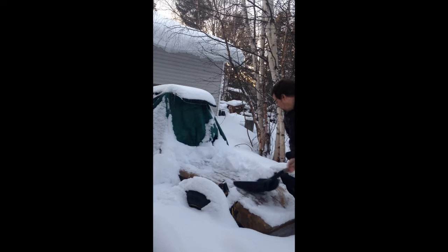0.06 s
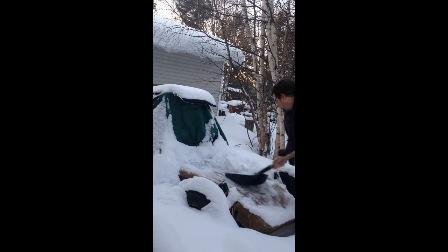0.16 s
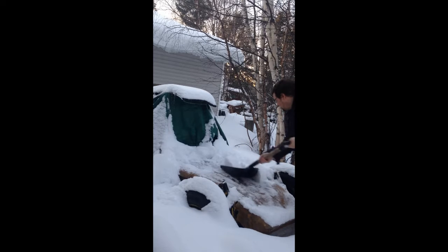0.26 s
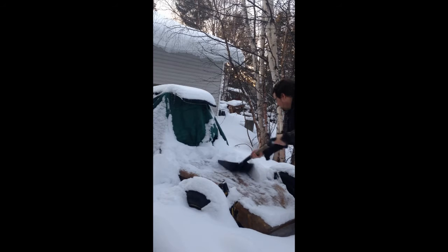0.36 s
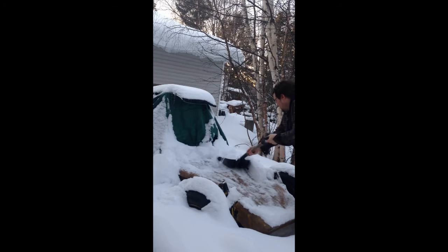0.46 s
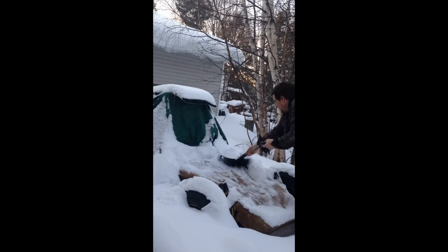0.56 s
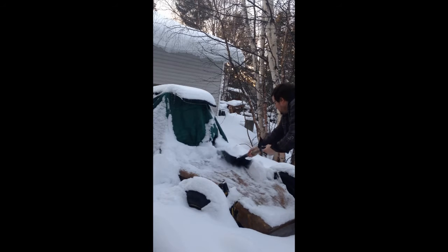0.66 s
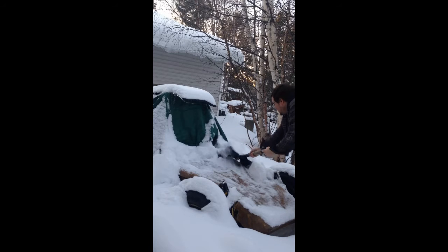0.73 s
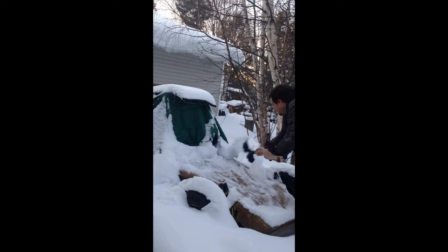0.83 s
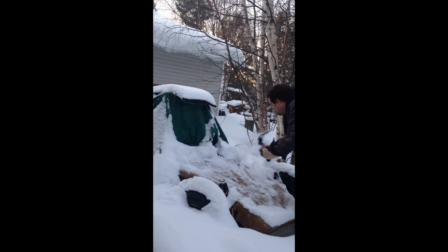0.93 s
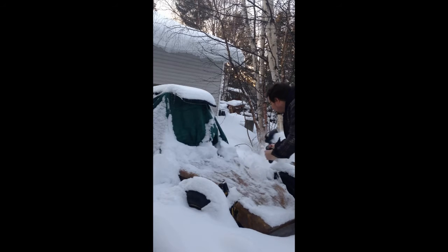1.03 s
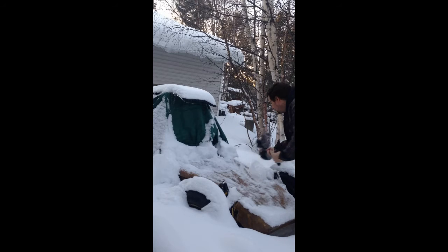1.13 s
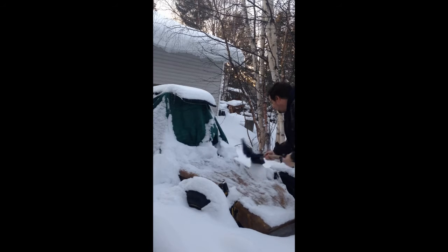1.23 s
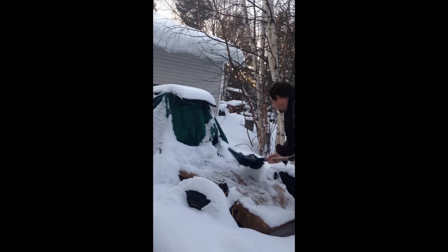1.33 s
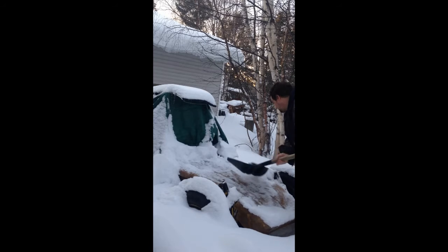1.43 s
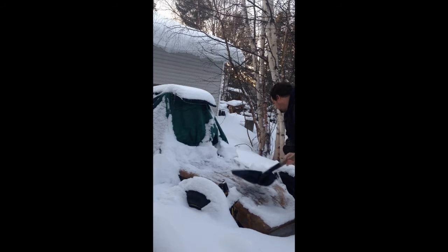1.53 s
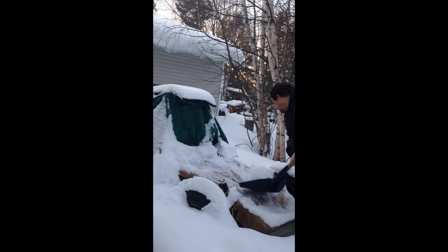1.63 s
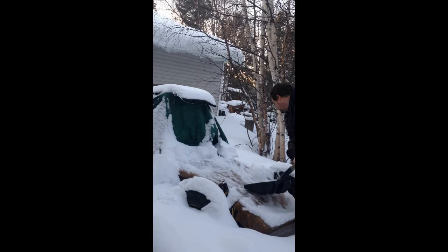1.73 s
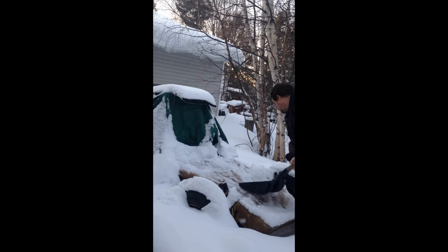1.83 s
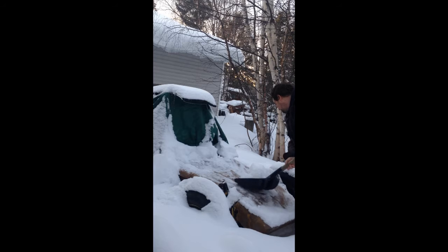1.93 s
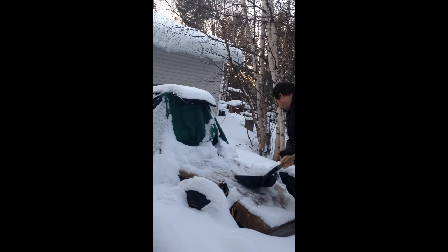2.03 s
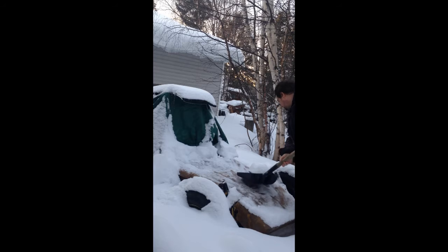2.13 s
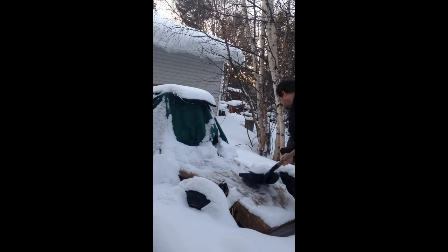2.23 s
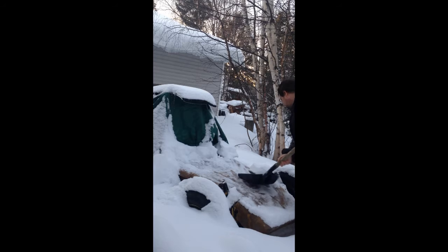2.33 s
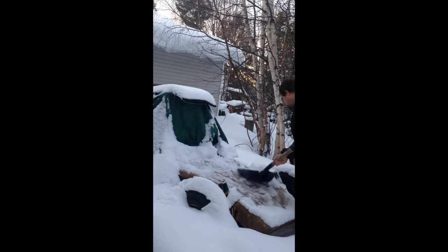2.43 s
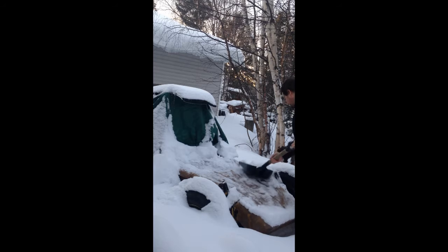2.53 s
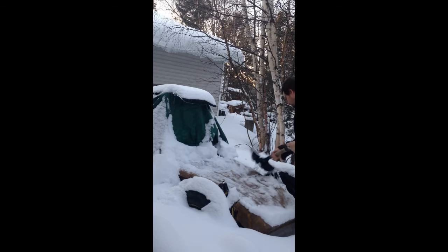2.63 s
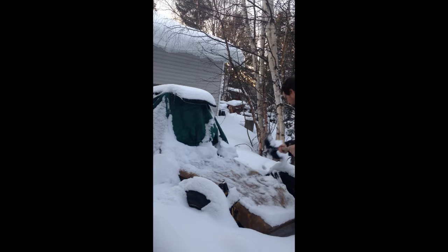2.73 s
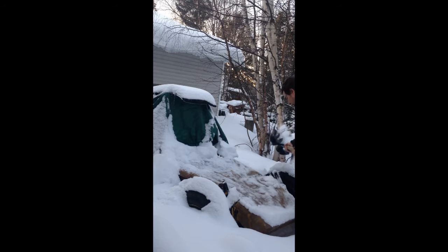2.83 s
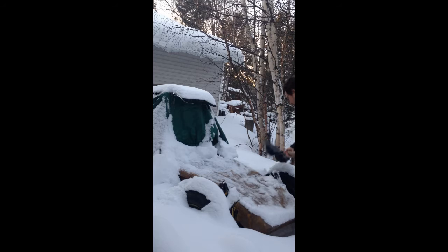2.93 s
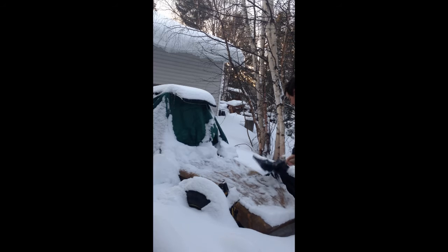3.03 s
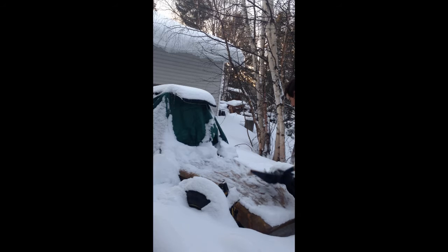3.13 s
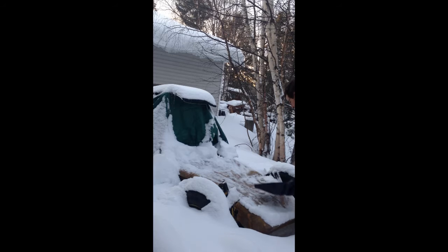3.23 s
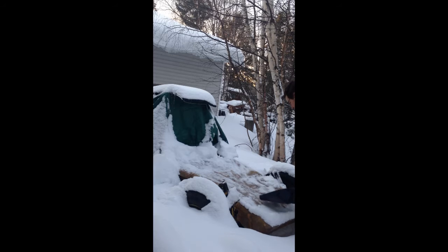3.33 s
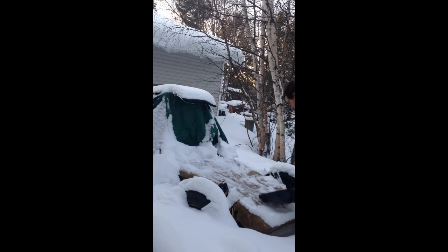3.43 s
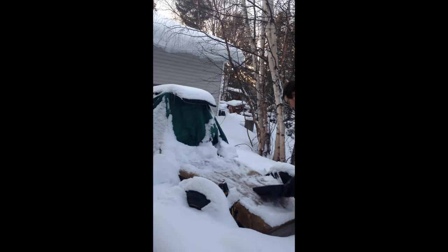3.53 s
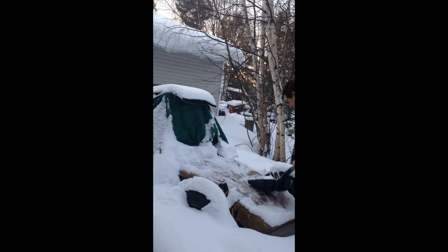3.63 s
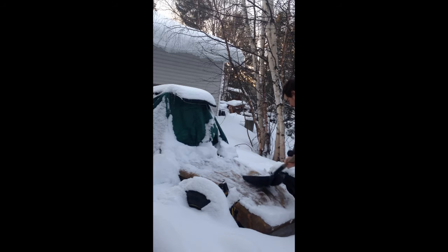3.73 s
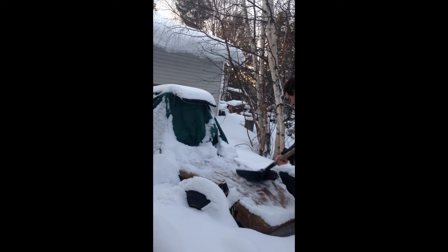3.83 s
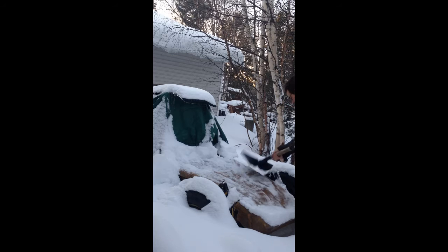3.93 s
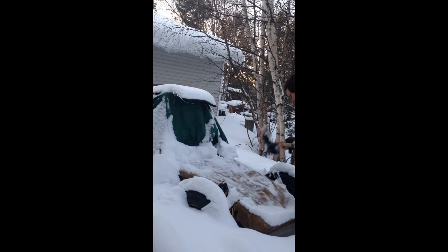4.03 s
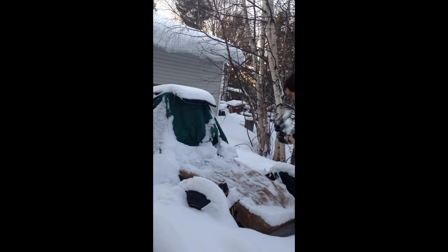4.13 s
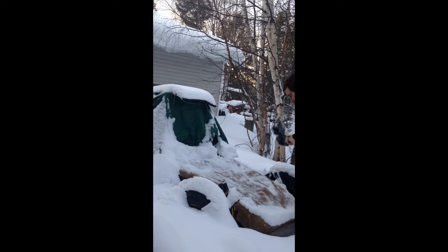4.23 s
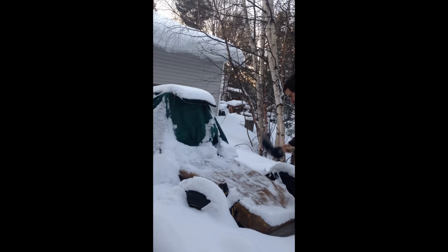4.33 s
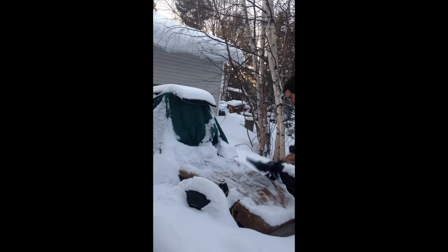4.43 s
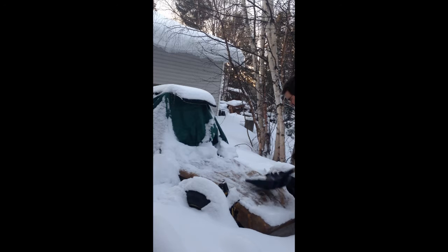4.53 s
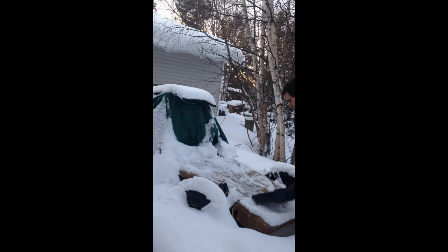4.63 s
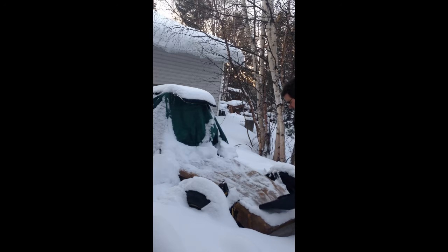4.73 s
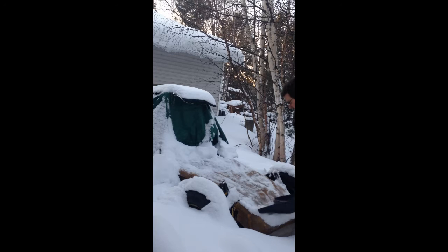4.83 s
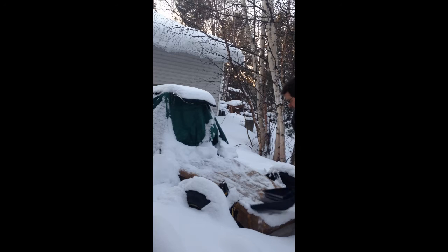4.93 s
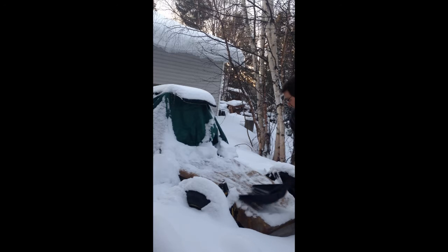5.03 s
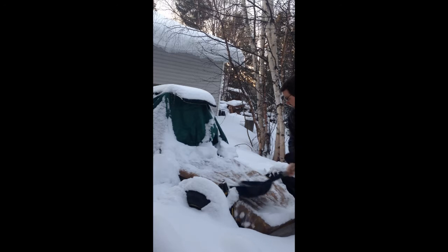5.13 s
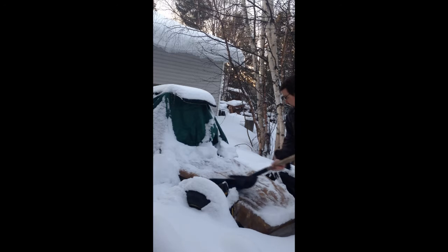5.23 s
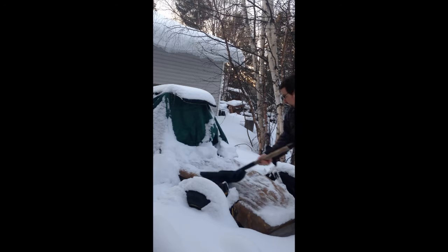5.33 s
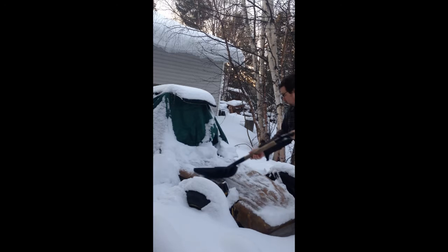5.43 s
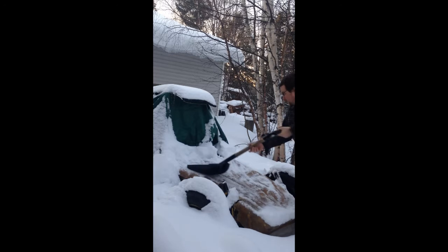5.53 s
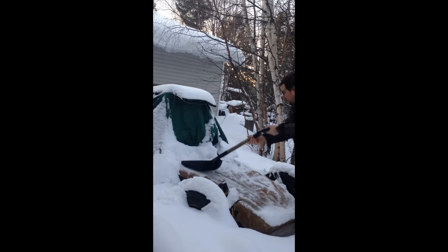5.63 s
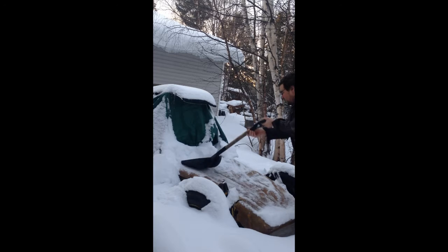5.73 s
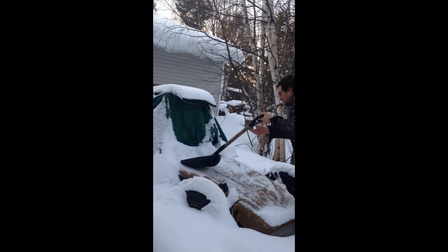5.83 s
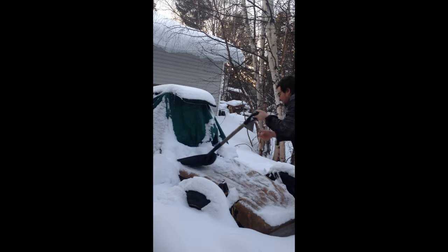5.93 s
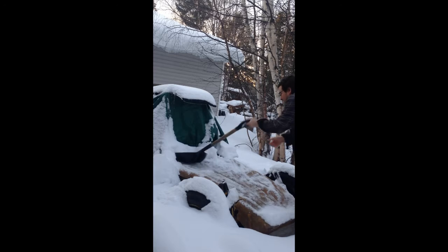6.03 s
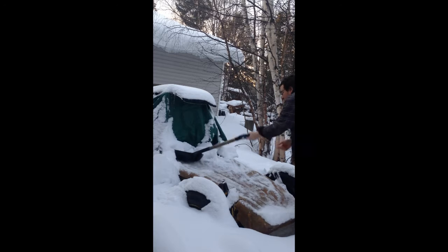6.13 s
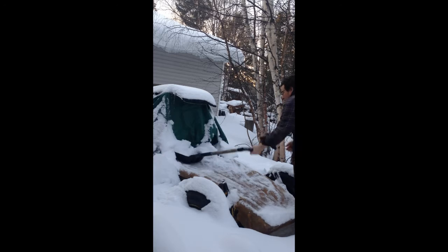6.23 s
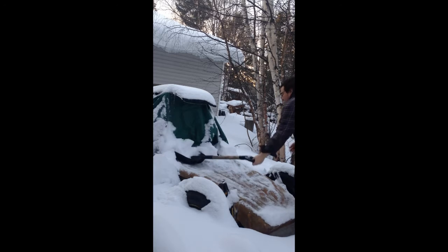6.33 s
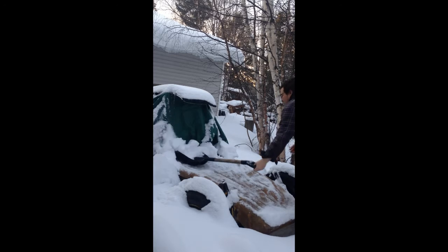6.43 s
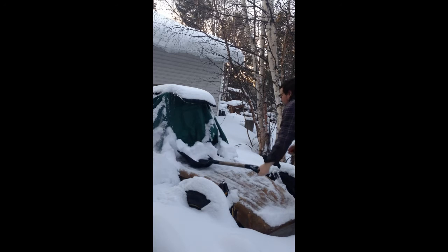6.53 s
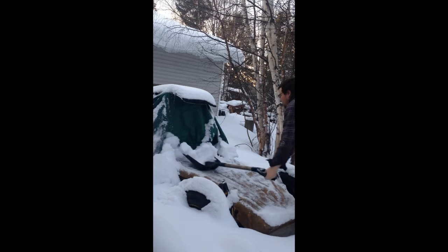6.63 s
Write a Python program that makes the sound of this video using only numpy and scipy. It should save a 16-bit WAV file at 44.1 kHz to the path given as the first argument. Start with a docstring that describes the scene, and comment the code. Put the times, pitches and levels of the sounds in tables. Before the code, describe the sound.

A plastic shovel scrapes and crunches through packed snow on a woodpile, in several strokes with short pauses, outdoors.

```python
"""A plastic snow shovel bites into packed snow on a woodpile, scrapes along and tips its load.
Snow crystals break against the blade in a dense crunch while lumps crack off and crumbs drop.
The blade, its hollow belly and the pile ring dully; the edge adds a crisp hiss.
Distant rumble and faint air lie underneath, with a few dull echoes; one microphone, outdoors."""
import sys
import numpy as np
from scipy import signal
from scipy.fft import rfft, irfft
from scipy.io import wavfile

SR = 44100
rng = np.random.default_rng(int(sys.argv[2]) if len(sys.argv) > 2 else 0)


def bounce(signal):
    """Save signal as a 16-bit WAV file at the path given by the first command-line argument."""
    frames = np.transpose(np.atleast_2d(signal))
    limited = np.clip(frames, -1, 1)
    pcm = np.round(limited * 32767).astype(np.int16)
    wavfile.write(sys.argv[1], SR, pcm)


N = 294147

# pressure on the snow, one list a stroke:
# (time [s], crunch level [dB], treble over crunch [dB], bass over crunch [dB])
STROKE_CURVES = [
    [(0.0, -25.5, -7, -2), (0.062, -30.5, 2.5, -14), (0.078, -33, 3.5, -7), (0.124, -34.5, -4, -6),
     (0.14, -47.5, -3, -4), (0.232, -22.5, 2.5, -8), (0.278, -25, -7, -15), (0.292, -32.5, 4, -3),
     (0.32, -17.5, -5.5, -14), (0.462, -33.5, 1.5, -9), (0.586, -29, -12, -9), (0.608, -39, -4, -13)],
    [(1.756, -22.5, -19.5, 1), (1.778, -21.5, -5, -5), (1.82, -43.5, -10, -1), (1.84, -45, 6, 7),
     (1.908, -25, -3.5, -9), (1.914, -23.5, -0.5, -14), (1.976, -27, 7, -8.5), (2.144, -43, 4, 1),
     (2.176, -37.5, -1, -13), (2.222, -55.5, 8, -8), (2.416, -61.5, -2, -9), (2.425, -54, 7, -11)],
    [(2.43, -69, 21, -3), (2.446, -29.5, 2, -6), (2.48, -32.5, 3, -22), (2.504, -25, 3.5, 0.5),
     (2.514, -19, -8, -6.5), (2.534, -28.5, 4.5, -2), (2.622, -21.5, -10, -9), (2.648, -26, -5, -9),
     (2.664, -34.5, -7, -6), (2.722, -50.5, 4, -6), (2.726, -55, 14, -6), (2.86, -72.5, 7, -9)],
    [(3.492, -33, -25, -6), (3.53, -49, -8, 10), (3.61, -20, -2, -18), (3.66, -21, -10, -5),
     (3.728, -24.5, -6, -7), (3.758, -15, -5.5, -2.5), (3.806, -32.5, 3, -3), (3.828, -31.5, -2, 1),
     (3.894, -26, 4, -11), (4.004, -17, -11, -16.5), (4.052, -38, -7.5, -14.5), (4.2, -69.5, 1, -4)],
    [(4.792, -35, 0, -6), (4.798, -22, -8.5, -16.5), (4.808, -19, -3, -2), (4.832, -23.5, -12, -9),
     (4.888, -45, -12, -7), (4.934, -54.5, -10, 18), (4.99, -37, -26, 4)],
    [(5.0, -35, -22, -10), (5.06, -27, -10.5, -10), (5.094, -32, -3, 4), (5.124, -23.5, -7, -5),
     (5.172, -18, -4.5, 2), (5.228, -30, -10.5, 3), (5.26, -22.5, -3, -15), (5.416, -22.5, 0, -1.5),
     (5.522, -25.5, -3.5, -25), (5.534, -29, -3, -11), (5.568, -24, -0.5, -39), (5.6, -34, -2, -24)],
    [(5.61, -35.5, 0, -17), (5.634, -34.5, -6, -10), (5.646, -31.5, -5.5, -15), (5.676, -28, -9.5, -9),
     (5.696, -40, 6.5, 4), (5.728, -32, -2.5, -3), (5.758, -32.5, -2.5, -14), (5.768, -24.5, -1.5, -10),
     (5.814, -24, -2, 1), (5.886, -37, -3.5, -7), (5.936, -31.5, -7.5, -13), (5.98, -42.5, 0, 1)],
    [(5.99, -39, 3.5, -8), (6.024, -29, 1.5, -8), (6.136, -21.5, -3, -2.5), (6.214, -22, -4, -2),
     (6.294, -44.5, -4, 0), (6.324, -32.5, -4.5, -6), (6.384, -35.5, -3, -4), (6.41, -37, 0, -16),
     (6.434, -44, 0, 1), (6.556, -28, -2.5, -4), (6.562, -36.5, 2, 2), (6.67, -38, 4, 0)],
]
# how load and angle colour each stroke: (belly boost [dB], upper blade boost [dB])
STROKE_COLOURS = [(0.25, 1.8), (1.6, 0.1), (6, 1.1), (0.8, -1.3), (-1.4, -2.2), (0, -1), (-2, 3.3),
                  (2.4, 1.2)]
# snow sliding and settling, one list a pause: (time [s], crunch level [dB], treble over crunch [dB])
SETTLING_CURVES = [
    [(0.612, -34, -17), (0.618, -27, -33), (0.636, -45, -5), (0.834, -55, -0.5), (1.116, -58, -6),
     (1.34, -85, 9)],
    [(1.35, -75, 7), (1.402, -45.5, -7.5), (1.462, -78, 10), (1.502, -67, -14), (1.552, -86.5, 22.5),
     (1.73, -87, -5)],
    [(2.87, -64.5, 2.5), (3.128, -80.5, -1.5), (3.142, -63.5, -22), (3.262, -84, 3), (3.318, -72.5, -10.5),
     (3.47, -75, -6.5)],
    [(4.21, -69, 4), (4.422, -65.5, -16), (4.474, -81, 9.5), (4.5, -63, -2.5), (4.566, -68.5, 8.5),
     (4.77, -83, -4)],
]
# lumps cracking off and crumbs dropping:
# (time [s], relative level [dB], hiss offset [dB], hollow knock offset [dB], base 60 dB decay time [s])
LUMP_CRACKS = [(0.056, -8.5, -10, -12, 0.055), (0.163, -16, -5.5, -16, 0.051),
               (0.203, -6.5, -2.5, -20, 0.11), (0.224, -4, -10, -5, 0.059), (0.312, -3, -41, 3.5, 0.042),
               (0.336, -7.5, -17, -16, 0.055), (0.372, 0, -14, -30, 0.069), (0.497, -17, -20, -10, 0.062),
               (0.572, -27, -1, -18.5, 0.055), (0.617, -10.5, -39, -16.5, 0.032),
               (0.676, -38, -24, -3, 0.055), (0.693, -26, -9, 11, 0.031), (0.733, -33, -14, -16, 0.046),
               (0.798, -28, -12, -19, 0.091), (0.919, -27.5, -25, -4.5, 0.051),
               (1.368, -41, -12, -5, 0.055), (1.399, -28.5, -5, -10, 0.055), (1.504, -46.5, -13, -3, 0.044),
               (1.754, -10.5, -14, -6, 0.047), (1.788, -16, -8, 3, 0.055), (1.864, -5, -5, -12, 0.1),
               (1.899, -0.5, -4, -14, 0.1), (1.948, -26, -13, -16, 0.045), (2.033, -15, -3, -21, 0.083),
               (2.11, -42, -16, -19, 0.055), (2.148, -15, -13, -15, 0.05), (2.243, -31, -16, -19.5, 0.055),
               (2.333, -37, 3.5, -14, 0.055), (2.384, -35.5, -5, -14.5, 0.072),
               (2.428, -32, 5, -21.5, 0.055), (2.439, -16, -6, -11, 0.055), (2.464, -15, -7, -12.5, 0.055),
               (2.511, -17.5, -15.5, -5.5, 0.055), (2.6, -0.5, -13, -11.5, 0.055),
               (2.643, -3, -21, -9.5, 0.034), (2.672, -22, -1, -10.5, 0.055), (2.729, -24, 1.5, -13, 0.042),
               (2.761, -28, -6, -24, 0.052), (2.773, -35.5, 5.5, -28, 0.055), (2.792, -28, -15, -26, 0.055),
               (3.148, -54.5, -16.5, -3, 0.055), (3.325, -45, -26, 5, 0.055),
               (3.492, -33, -2.5, -16.5, 0.07), (3.536, -22, -8, 0, 0.1), (3.556, -16.5, -6, 1.5, 0.06),
               (3.595, -12, 0.5, -12.5, 0.094), (3.643, 1, -15.5, -9.5, 0.055),
               (3.743, -12, 1.5, -16.5, 0.055), (3.752, -6.5, 2.5, -15.5, 0.061),
               (3.844, -7, -9, -13.5, 0.038), (3.881, -0.5, -6.5, -16, 0.087), (3.924, -19, -6, -10, 0.037),
               (3.959, 4.5, -17.5, -12, 0.036), (3.989, -8, -15, -15, 0.055), (4.095, -39, 2, -25, 0.071),
               (4.153, -38, -1, -16.5, 0.068), (4.264, -51.5, -4.5, -10.5, 0.051),
               (4.501, -41, -17, -17, 0.052), (4.8, -14, -14, -17.5, 0.062), (4.946, -34, -13, -1, 0.06),
               (4.982, -35, -19, 18, 0.055), (5.04, -23, -7, 0, 0.075), (5.128, -19, -10, -7, 0.055),
               (5.166, -17.5, 1, -17, 0.05), (5.241, -9, -33, 1.5, 0.056), (5.26, -7.5, -27, -4, 0.051),
               (5.473, -1.5, -21, -10, 0.055), (5.509, -1, -25, -34, 0.075), (5.545, -4, -29, -28, 0.09),
               (5.65, -18, -17, -22, 0.06), (5.72, -10.5, -10, -18, 0.062), (5.765, -0.5, -32, -6.5, 0.039),
               (5.801, -3, -34, -21, 0.055), (5.986, -13, -27, -21, 0.057), (6.014, -7, -32, -8, 0.055),
               (6.105, -5, -14, -29, 0.15), (6.305, -14, -24, -15, 0.055), (6.347, -10, -27, -16, 0.06),
               (6.4, -11.5, -22, -29, 0.06), (6.456, -24.5, 2.5, 6, 0.086)]
# resonances of the shovel and the woodpile: (frequency [Hz], bandwidth [Hz], relative level [dB])
LOW_BLADE_MODES = [(834, 97, -3.5), (1016, 123, 1.5), (1200, 97, 1.5), (1307, 140, -0.5), (1424, 74, 4),
                   (1612, 120, 0.5)]
UPPER_BLADE_MODES = [(1865, 150, -1.5), (2040, 69, 1.5), (2196, 110, -1), (2444, 100, -2),
                     (2640, 150, -1.5), (3026, 210, -6), (3268, 220, -6), (3750, 790, -11)]
BELLY_MODES = [(283, 70, -15.5), (421.2, 49, -1), (479.3, 45, 0), (581, 100, 0), (690, 140, -1.5),
               (760, 50, 0)]
PILE_MODES = [(56.4, 66, -8.5), (87, 25, 1), (144, 49.3, -3), (194.4, 55, -4.5)]
EDGE_MODES = [(4280, 290, -8), (5000, 520, -1.5), (5500, 650, -1.5), (6420, 700, 0.5), (7400, 500, 1.5),
              (8050, 590, 0.5), (8980, 310, 0.5), (9500, 190, 1.5), (10290, 390, 1), (11000, 370, -0.5),
              (12070, 480, 1), (13220, 650, -2.5), (14000, 900, -2.5), (15000, 460, -6)]
# tone of the far rumble and air: (frequency [Hz], relative spectral level [dB])
YARD_SPECTRUM = [(18, -59), (30, -19), (103, 0), (208, -19.5), (277, -19), (360, -15), (400, -18),
                 (811, -27), (1110, -28.5), (6080, -41), (10300, -37), (15600, -47)]
# reflections off the shed and trees: (delay [s], level [dB])
YARD_ECHOES = [(.011, -22), (0.022, -21), (.041, -18)]


def from_db(db):
    """Decibels to gain."""
    return 10 ** (np.asarray(db) / 20)


def rms_one(x):
    """Scale to unit rms."""
    return x / np.sqrt(np.mean(x ** 2) + 1e-20)


def drift(rate_hz):
    """Smooth random wander of about unit spread."""
    step, warm_up = 32, 1400
    pole = np.exp(-2 * np.pi * rate_hz * step / SR)
    slow = signal.lfilter([1], [1, -2 * pole, pole * pole], rng.standard_normal(N // step + warm_up + 2))
    slow = slow[warm_up:]
    return np.interp(np.arange(N) / step, np.arange(len(slow)), rms_one(slow - slow.mean()))


def coloured(x, spectrum):
    """Minimum-phase EQ through (frequency [Hz], level [dB]) points."""
    grid_hz = np.linspace(1, SR / 2, 4097)
    hz, level_db = np.transpose(spectrum)
    cepstrum = irfft(np.log(from_db(np.interp(np.log(grid_hz), np.log(hz), level_db))))
    cepstrum[1:4096] *= 2
    cepstrum[4097:] = 0
    return signal.fftconvolve(x, irfft(np.exp(rfft(cepstrum))))[:N]


def ring(force, modes, wander_db, wander_hz):
    """Parallel resonances; as the contact point wanders, each is driven harder or softer."""
    out, power = np.zeros(N), 0
    for k, (hz, width, level_db) in enumerate(modes):
        pole = np.exp(-np.pi * width / SR)
        gain = from_db(level_db) * (-1) ** k * (1 - pole * pole) / 2
        feedback = [1, -2 * pole * np.cos(2 * np.pi * hz / SR), pole * pole]
        drive = force * from_db(wander_db * drift(wander_hz))
        out += signal.lfilter([gain, 0, -gain], feedback, drive)
        power += from_db(2 * level_db) * np.pi * width / SR
    return out / np.sqrt(power)


def stroke_levels(bite_s=0.004, settling_bass_db=-4):
    """Crunch, treble, bass, belly and upper blade curves in dB; a lull holds until the next bite."""
    rows = [(*row, *colour) for stroke, colour in zip(STROKE_CURVES, STROKE_COLOURS) for row in stroke]
    rows += [(*row, settling_bass_db, 0, 0) for pause in SETTLING_CURVES for row in pause]
    for stroke in STROKE_CURVES[1:]:
        start_s = stroke[0][0]
        lull = max(row for row in rows if row[0] < start_s)
        rows.append((max(start_s - bite_s, lull[0]), *lull[1:]))
    times, *curves = np.transpose(sorted(rows))
    return [np.interp(np.arange(N) / SR, times, curve) for curve in curves]


def crystal_grains(per_s, spread_db, rubbing):
    """Crystals of uneven size break at random over a smooth bed of rubbing."""
    sizes = from_db(spread_db * np.minimum(rng.exponential(1, N), 5)) * rng.choice([-1, 1], N)
    breaks = rng.random(N) < per_s / SR
    return rms_one(rms_one(sizes * breaks) + rubbing * rng.standard_normal(N))


def ice_crumbs(per_s, leap_db, decay_s):
    """A gain that leaps whenever an ice crumb snaps, then falls straight back."""
    leaps = (rng.random(N) < per_s / SR) * from_db(leap_db) * np.minimum(rng.exponential(1, N), 2)
    return rms_one(1 + signal.lfilter([1], [1, -np.exp(-1 / (decay_s * SR))], leaps))


def yard():
    """Far rumble and faint air, wavering gently."""
    return from_db(-58.5 + 1.3 * drift(5)) * rms_one(coloured(rng.standard_normal(N), YARD_SPECTRUM))


def crack_envelope(decay_scale, rise_s, snap_db, offset_db=0, crest_db=13.5):
    """Each lump lets go with a snap of a few milliseconds, then crumbles away."""
    t = np.arange(SR // 4) / SR
    out = np.zeros(N + len(t))
    attack = 1 - np.exp(-t / rise_s)
    snap = from_db(snap_db) * np.exp(-t / 0.00091)
    times, levels_db, _, _, decays_s = np.transpose(LUMP_CRACKS)
    for start_s, level_db, decay_s in zip(times, levels_db + offset_db, decays_s):
        crumble = from_db(-60 * t / max(decay_s * decay_scale, 0.005))
        at = round(start_s * SR)
        out[at:at + len(t)] += from_db(level_db - crest_db) * (snap + crumble) * attack
    return out[:N]


def crack_clicks(offset_db):
    """The clean click that opens every crack."""
    out = np.zeros(N)
    times, levels_db = np.transpose(LUMP_CRACKS)[:2]
    out[np.round(times * SR).astype(int)] = from_db(levels_db + offset_db)
    return out


def blade_ring(grains, low_load, upper_load):
    """Grains and cracks ring the plastic blade in its low and upper ranges."""
    cracks = from_db(-5) * crack_envelope(decay_scale=0.7, rise_s=0.00049, snap_db=1.5)
    clicks = crack_clicks(2.5)
    low = ring(grains * (low_load + cracks) + clicks, LOW_BLADE_MODES, wander_db=2.6, wander_hz=14)
    upper = ring(grains * (upper_load + cracks) + clicks, UPPER_BLADE_MODES, wander_db=2.6, wander_hz=16)
    return low + upper


def snow_rub(load):
    """Snow slides on snow and snaps: midrange noise heard directly, with no ring."""
    snaps = crack_envelope(decay_scale=0.24, rise_s=0.00032, snap_db=-7)
    mids = signal.butter(2, [700, 3600], "band", fs=SR, output="sos")
    return from_db(-2) * signal.sosfilt(mids, rng.standard_normal(N) * (snaps + load))


def belly_knock(grains, load, knock_db):
    """The scoop's belly gives the crunch its body and answers cracks with a hollow knock."""
    cracks = crack_envelope(decay_scale=1.6, rise_s=0.00034, snap_db=-2.2, offset_db=knock_db)
    force = grains * (load + cracks) + crack_clicks(10 + knock_db)
    return ring(force, BELLY_MODES, wander_db=2.2, wander_hz=12)


def pile_thud(grains, load, knock_db):
    """The woodpile rumbles under the push and thuds at each crack."""
    cracks = from_db(-10) * crack_envelope(decay_scale=6.2, rise_s=0.0012, snap_db=-8, offset_db=knock_db)
    return ring(grains * (load + cracks), PILE_MODES, wander_db=2.5, wander_hz=5.7)


def edge_hiss(grains, load, hiss_db):
    """Fine grains sizzle on the edge, with a sharp tick as each lump cracks."""
    cracks = crack_envelope(decay_scale=0.97, rise_s=0.00013, snap_db=13.5, offset_db=hiss_db)
    return ring(grains * (load + cracks), EDGE_MODES, wander_db=1.5, wander_hz=30)


def shovel():
    """The strokes press snow against blade, belly, pile and edge, each under its own load."""
    crunch_db, treble_db, bass_db, belly_boost_db, upper_boost_db = stroke_levels()
    upper_db = 0.5 + upper_boost_db + 0.7 * treble_db
    belly_db = belly_boost_db + 0.18 * bass_db
    _, _, hiss_db, knock_db, _ = np.transpose(LUMP_CRACKS)
    judder = drift(46)   # the whole scoop sticks and slips as one
    coarse = crystal_grains(per_s=2500, spread_db=3, rubbing=0.95)
    fine = crystal_grains(per_s=5000, spread_db=2, rubbing=0.98)
    crumbs = ice_crumbs(per_s=82, leap_db=-3, decay_s=0.0066)
    blade_load = from_db(crunch_db + 1.1 * judder)
    blade = blade_ring(coarse, blade_load, crumbs * blade_load * from_db(upper_db))
    rub = snow_rub(from_db(crunch_db + upper_db / 2 + 3.5))
    belly = belly_knock(coarse, from_db(crunch_db + belly_db + 2.1 * judder), knock_db)
    pile = pile_thud(fine, from_db(crunch_db + bass_db), knock_db)
    edge = edge_hiss(fine, crumbs * from_db(crunch_db + treble_db + 0.63 * judder), hiss_db)
    return blade + rub + belly + pile + edge


def scene():
    """The shovel up close with a few dull echoes over the yard, the same in both channels."""
    near = shovel()
    dull = signal.lfilter([0.3], [1, -0.7], near)
    out = near + yard()
    for delay_s, level_db in YARD_ECHOES:
        lag = round(delay_s * SR)
        out[lag:] += from_db(level_db) * dull[:-lag]
    return np.array([out, out])


def record(dry):
    """The microphone drops the deep bass, peaks are rounded, the very top is cut."""
    low_cut = signal.butter(2, 45, "high", fs=SR, output="sos")
    high_cut = signal.cheby2(14, 70, 16200, fs=SR, output="sos")
    rounded = 1.5 * np.tanh(signal.sosfilt(low_cut, dry) / 1.5)
    return signal.sosfilt(high_cut, rounded)


dry = scene()
out = record(dry)
bounce(out)
```